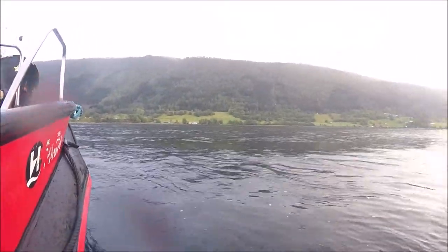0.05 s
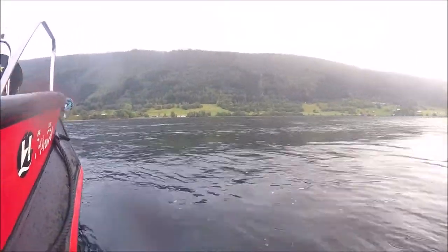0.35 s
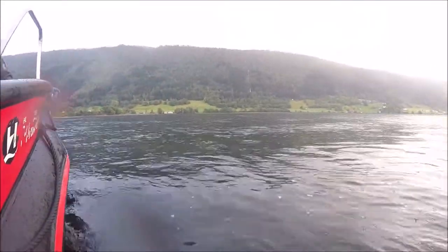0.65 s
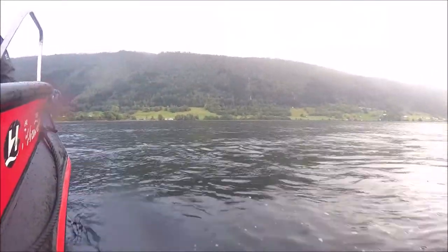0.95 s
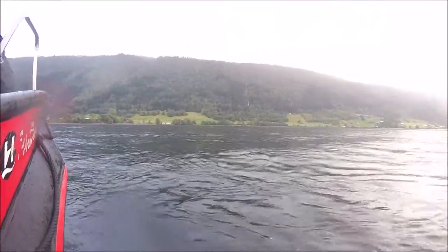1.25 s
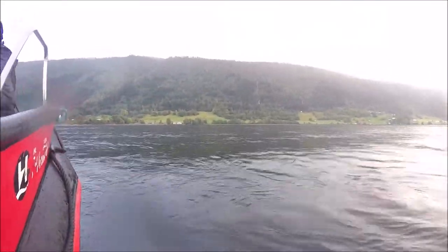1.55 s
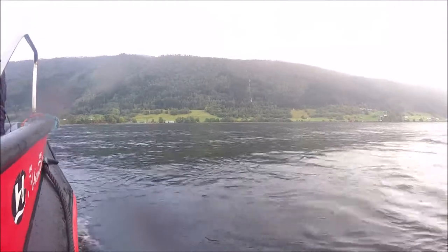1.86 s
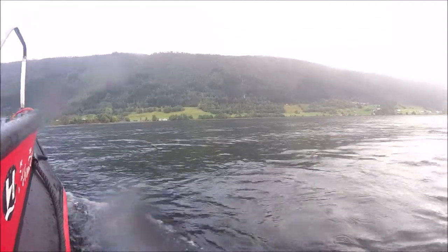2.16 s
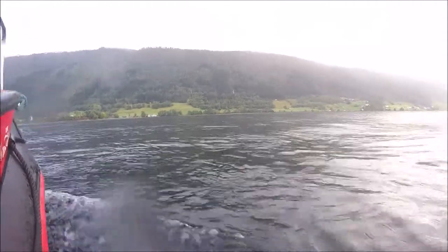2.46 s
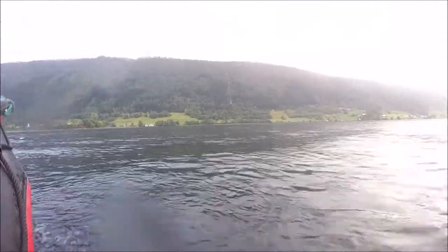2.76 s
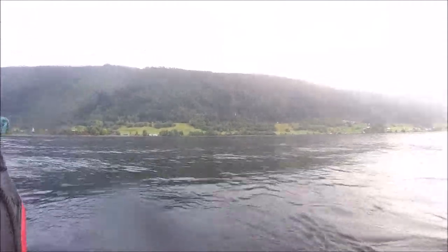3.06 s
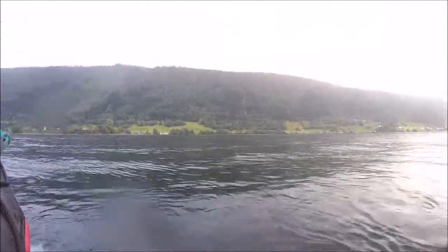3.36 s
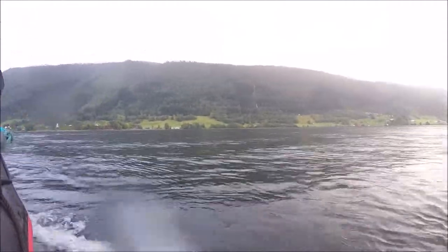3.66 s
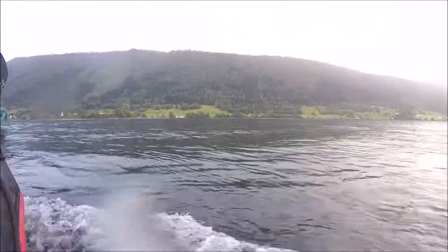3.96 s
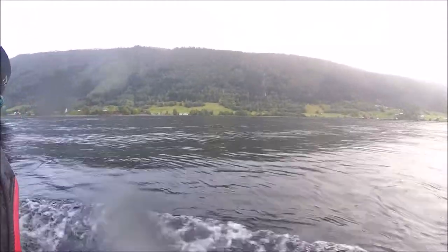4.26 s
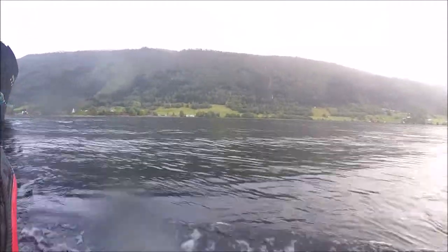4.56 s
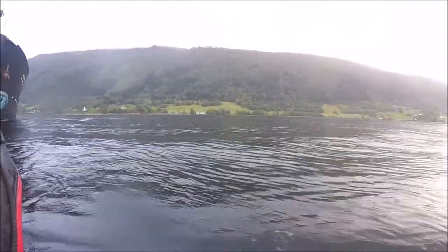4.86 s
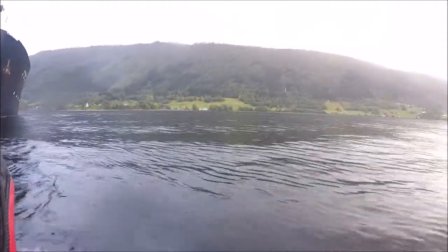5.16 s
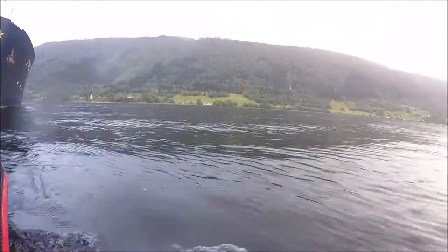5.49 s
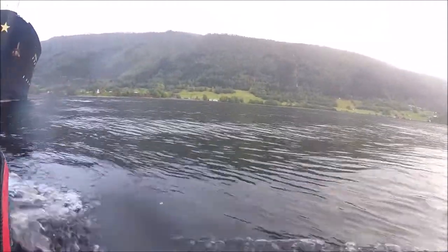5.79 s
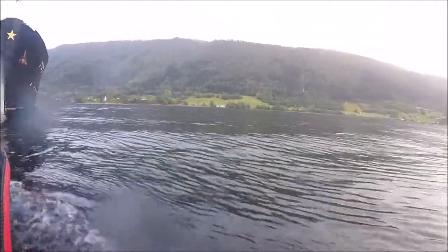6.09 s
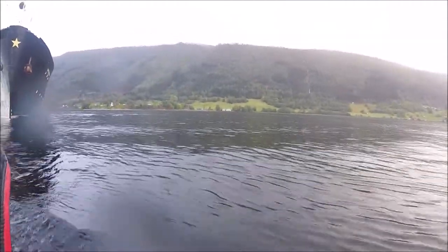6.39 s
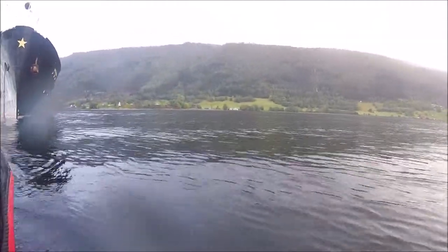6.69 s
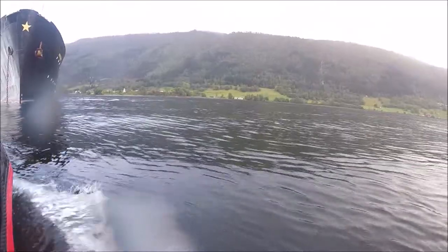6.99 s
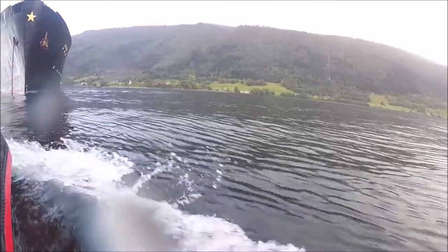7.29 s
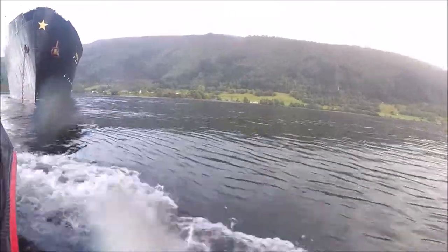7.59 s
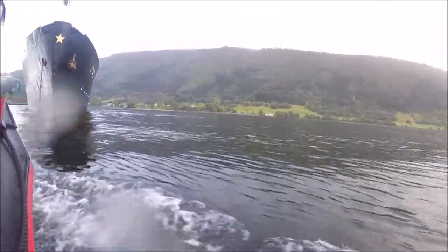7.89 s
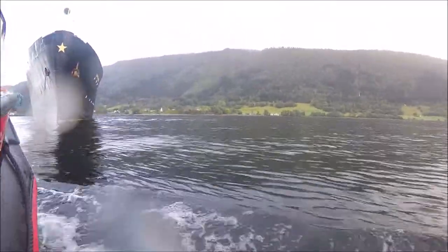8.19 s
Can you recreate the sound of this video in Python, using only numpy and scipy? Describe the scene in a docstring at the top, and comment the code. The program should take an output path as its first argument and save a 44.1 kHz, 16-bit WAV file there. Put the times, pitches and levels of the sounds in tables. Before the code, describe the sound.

Water surges and splashes along a small boat's hull over a faint engine hum and wind rumble, with sharp drop ticks on the microphone.

```python
"""Drops tick sharply on a waterproof case over a rumble of wind; then a bow wave starts to surge.
An inflatable boat is running over calm water, heard from inside the case, low beside the hull.
Each wave breaks in ringing bubbles, spray and foam, with wavelets slapping and air pockets gulping.
The case's narrow resonances colour the waves and slaps; an engine hums behind the wash of the wake."""
import sys
import numpy as np
from scipy import signal
from scipy.fft import rfft, irfft
from scipy.io import wavfile
from scipy.ndimage import uniform_filter1d

SR = 44100
rng = np.random.default_rng(int(sys.argv[2]) if len(sys.argv) > 2 else 0)


def output_pcm(signal):
    """Save a mono or channel-first signal as 16-bit PCM at the path in sys.argv[1].

    Samples are clipped to [-1, 1] before scaling.
    """
    pcm = np.clip(np.atleast_2d(signal).T, -1, 1) * 32767
    wavfile.write(sys.argv[1], SR, np.round(pcm).astype(np.int16))


N = 363384
TIME = np.arange(N) / SR

# Waves breaking from the bow. Each row: crest, rise and hold in seconds, fade in dB per second,
# then rush level, tilt toward small bubbles, extra spray and extra deep churn, all in dB.
BOW_WAVES = [(1.068, 0.12, .04, 34.5, -59, -3, -18, 1), (1.45, 0.29, .15, 40, -59.5, -3.5, -17, 1),
             (1.68, .09, .1, 70, -50.5, -0.5, -4, 5.5), (1.85, .08, .05, 50, -46, -8.5, 2.5, 0.5),
             (2.33, .28, 0.22, 105.5, -55.5, -14, -4, 3.5), (3.091, .2, .12, 60, -53.5, -1, -3, 1.5),
             (3.29, .11, .08, 70, -48, 5, 7, 5), (3.47, .17, .54, 47, -41.5, -3, 2.5, -2.3),
             (4.36, .08, .03, 60, -53, 3, -2, -3), (4.53, .12, .19, 70, -48, 11, 4, -6),
             (4.81, .1, .04, 230, -44, -16, 0.5, -1), (5, .07, .03, 80, -52.5, -11, 4.5, -2),
             (5.16, .12, .15, 30, -50, 2.5, 1, -3), (5.51, .08, .05, 45, -51, 3, 2, -6),
             (5.8, .1, .18, 110, -45.5, 3.5, -0.7, -20), (6.72, .08, .04, 80, -47.5, 8, -3.5, -16),
             (6.93, .14, .06, 60, -47, 11, 5.5, 0), (7.07, .16, .49, 45, -39, -4.5, .2, -4.5),
             (7.44, .09, .04, 80.5, -48, 5, -11, 11), (8.08, .09, .06, 70, -48.5, 3, -3, 6.5),
             (8.22, .16, .1, 60, -45.5, 7, 5, -8.5)]
# Ripples between waves: opening rush level, small-bubble tilt, extra spray, extra churn, all in dB.
HULL_RIPPLES = (-67, -4.5, 2, 11)
# The tone of breaking water. Each row: frequency in Hz, relative level in dB.
WATER_EQ = [(60, -11), (130, 1.5), (250, -8.5), (500, -11.5), (800, -12), (1600, -2), (3000, 1),
            (5000, -10), (8000, -22.5), (11000, -31), (15000, -32.5)]
# The case's peaks and notches. Each row: centre in Hz, half width in Hz, gain in dB.
CASE_EQ = [(1727, 240, 5), (2275, 171, -8.5), (2910, 240, 2), (3280, 170, 3.5), (3610, 193, -5),
           (4093, 163, 4.5), (5340, 370, 1.5), (6020, 240, -8.5), (6653, 370, 4), (7200, 190, -2.5),
           (7830, 330, 2.5), (9100, 560, 0), (10710, 870, 6.5), (12300, 460, 1)]
# The loudest hull slaps. Each row: start in seconds, peak in dB, bubble pitch in Hz, decay in seconds.
HULL_SLAPS = [(.294, -47.5, 3010, .007), (.573, -48, 2930, 0.0047), (1.476, -43, 3200, .004),
              (1.612, -41, 3370, 0.0054), (1.676, -30, 1320, .0045), (1.723, -39, 3130, 0.007),
              (1.756, -38.5, 1850, 0.0063), (1.873, -34.5, 3950, .008), (1.888, -33, 1970, .005),
              (2.299, -48, 1820, .006), (2.409, -35, 1807, 0.0045), (2.96, -44, 1950, 0.0067),
              (3.033, -48, 1700, .005), (3.158, -45.5, 1670, .004), (3.223, -37.5, 3270, 0.0074),
              (3.293, -41, 600, .0054), (3.952, -31, 3000, .005), (4.252, -45.5, 215, .006),
              (4.305, -35.5, 2920, .006), (4.348, -36, 2960, 0.01), (4.458, -37.5, 2920, .0045),
              (4.754, -29, 2790, .006), (4.856, -33.5, 3130, .004), (5.131, -37.5, 3100, .007),
              (5.861, -32.5, 1980, 0.006), (5.967, -37.5, 1950, .006), (6.516, -47, 3000, .005),
              (6.664, -45.5, 205, .0055), (6.682, -32.5, 2870, 0.0054), (6.825, -34.5, 3660, .007),
              (7.158, -27, 1920, 0.0053), (8.049, -36.5, 2830, 0.0079)]
# Deep slaps splash wider than bright ones. Each row: bubble pitch in Hz, splash level in dB.
SPLASH_BY_PITCH = [(600, 5), (1300, -3), (1800, -17), (3500, -14.5)]
# The biggest bubbles beside the hull. Each row: start in seconds, relative level in dB, pitch in Hz.
AIR_POCKETS = [(1.728, -49, 877), (1.902, -49, 940), (2.239, -52, 1028), (3.257, -48.5, 806),
               (4.772, -49, 462), (4.861, -43, 900), (5.211, -51, 715), (5.292, -47, 1120),
               (5.504, -50, 966), (6.099, -51, 1080), (6.859, -45, 1267), (7.436, -45.5, 552),
               (8.068, -40, 1150)]
# Drops hitting the case. Each row: start in seconds, peak in dB, tilt in dB per octave, ring factor.
DROP_HITS = [(0.0332, -39.5, 8, 1.44), (0.058, -21.5, 6.5, 0.28), (0.0915, -10, -2.5, 0.79),
             (1.666, -31, 1.5, 1.42), (3.3974, -6.5, 0, 1.25), (5.762, -27.5, 0, 1.1), (5.99, -34, -1, 1.3)]
# The struck case wall. Each row: frequency in Hz, relative level in dB, base 60 dB decay in seconds.
WALL_MODES = [(1170, -20.5, 0.0062), (2343, -2, 0.0096), (2880, -1, 0.0044), (3860, -8, 0.0046),
              (5270, -18.5, 0.0057), (7530, -18.5, 0.0043), (9800, -24, 0.0047), (12000, -28.5, 0.0021)]
# The tone of wind on the case. Each row: frequency in Hz, relative level in dB.
WIND_EQ = [(1, -50), (6, -11), (12, 1), (25, 1.5), (38, -8), (55, -7), (75, -9.5), (100, -20.5), (135, -31),
           (200, -40), (400, -45), (1500, -108)]
# Gusts. Each row: crest, rise and hold in seconds, fade in dB per second, relative level in dB.
WIND_GUSTS = [(.06, 0.11, 0.24, 9, -39), (1.1, 0.56, 0.57, 20, -38), (4.42, .08, 0.53, 70, -41.5),
              (5.42, 0.1, .1, 48, -39), (6.5, 0.13, 0.9, 13, -47.5)]
# Single buffets of air. Each row: centre in seconds, peak in dB, frequency in Hz.
WIND_BUFFETS = [(.354, -37, 58.6), (.795, -25, 28.2), (1.07, -36.5, 31.8), (1.226, -30.5, 41),
                (1.618, -26.5, 21.3), (1.705, -29, 41.3), (4.431, -27.5, 31.5), (4.574, -35, 43.4),
                (4.755, -30.5, 27.6), (6.689, -34.5, 49.5)]
# The engine's run. Each row: time in seconds, firing rate in Hz, base level in dB.
ENGINE_RUN = [(0, 53.6, -68), (.65, 53.3, -61.5), (1.25, 53.4, -66.5), (1.8, 54.3, -66.5),
              (2.3, 54.2, -63.5), (2.7, 53.8, -61.5), (3.1, 53.5, -72), (5, 53.4, -66), (6.4, 53.3, -76.5),
              (8.24, 53.5, -69)]
# The hum's harmonics. Each row: multiple of the firing rate, offset from the base level in dB.
HUM_HARMONICS = [(1, 13.5), (2, -0.5), (3, -4), (4, -14.5), (5, -29), (6, -27), (7, -24), (9, -21)]
# The tone of the wake. Each row: frequency in Hz, relative level in dB.
WAKE_EQ = [(30, -4), (120, 1), (200, -5.5), (300, -9), (500, -11.5), (1000, -14.5), (2300, -13.5),
           (4000, -20), (8000, -24), (15000, -28)]
# Where small bubbles, spray and churn sit. Each row: frequency in Hz, share of that boost applied.
SMALL_BAND = [(800, -0.0044), (1400, -0.27), (2050, -0.18), (2600, 0.3), (4200, 0.33), (5500, -0.007),
              (9000, 0.13), (14000, 0.2)]
SPRAY_BAND = [(4200, 0.058), (5600, 0.85)]
CHURN_BAND = [(750, 1.0), (1350, 0.071)]


def bow_wave(level_db=-0.5, foam_db=-3, spatter_db=-10, flutter_db=0.6, cloud_db=1.37):
    """Bubbles, spray and hissing foam swell together, their mix shifting as each wave breaks."""
    rush_db = np.interp(TIME, TIME[::64], surge(TIME[::64])[0])
    water = bubbles(rush_db) + amp(spatter_db) * spatter() + amp(foam_db) * rng.standard_normal(N)
    water = resonate(unit(water), lambda hz: spectrum(WATER_EQ, hz) + case_db(hz))
    hz, t, bands = signal.stft(water, SR, nperseg=512, noverlap=384)
    _, small_db, spray_db, churn_db = surge(t)
    spray_db += 2.5 * np.interp(t, TIME, wander(41))  # the high hiss flickers quickly at random
    small_db += 1.5 * np.interp(t, TIME, wander(9.2))  # the bubble size sways
    moving_eq_db = (np.outer(spectrum(SMALL_BAND, hz), small_db)
                    + np.outer(spectrum(SPRAY_BAND, hz), spray_db)
                    + np.outer(spectrum(CHURN_BAND, hz), churn_db))
    # clouds of like-sized bubbles come and go
    clouds = uniform_filter1d(rng.standard_normal(bands.shape), size=7, axis=0)
    clouds = unit(uniform_filter1d(clouds, size=12, axis=1))
    bands = bands * amp(moving_eq_db + cloud_db * clouds)
    water = signal.istft(bands, SR, nperseg=512, noverlap=384)[1][:N]
    return water * amp(level_db + rush_db + flutter_db * wander(21.3))


def surge(t, ripple_growth_db_per_s=0.82):
    """Ripples and waves add in power, each with its own mix: rush, small bubbles, spray, churn in dB."""
    ripples = amp(HULL_RIPPLES[0] + ripple_growth_db_per_s * t)
    waves = [amp(wave[4]) * swell(t, *wave[:4]) for wave in BOW_WAVES]
    power = np.array([ripples] + waves) ** 2
    mixes = amp([HULL_RIPPLES[1:]] + [wave[5:] for wave in BOW_WAVES]) ** 2
    total = power.sum(axis=0)
    return 10 * np.log10([total, *(mixes.T @ power / total)])


def bubbles(rush_db, base_per_s=4400, size_db=3.5, clump_db=2.0, pitches=44):
    """Bubbles of many sizes ring; a stronger surge makes so many that they melt into a rush."""
    crowd = amp(np.maximum(rush_db + 52, -3))
    births = np.cumsum(base_per_s / pitches * crowd * amp(clump_db * wander(35))) / SR
    out = np.zeros(N)
    for hz in np.geomspace(280, 14500, pitches):
        # small bubbles are more numerous and ring for more cycles
        count = int(births[-1] * (hz / 2000) ** 0.45)
        ping = bubble_ping(hz, cycles=9 * (hz / 2000) ** 0.24, glide=0.032)
        when, luck = rng.random((count, 2)).T
        onsets = np.searchsorted(births, when * births[-1])
        sizes = amp(size_db * np.minimum(-np.log(1 - luck), 4)) / np.sqrt(crowd[onsets])
        triggers = np.bincount(onsets, sizes, N)
        out += np.sqrt(hz) * unit(signal.oaconvolve(triggers, ping)[:N])
    return unit(out)


def bubble_ping(hz, cycles, glide):
    """One bubble: a quick attack, a short ring and a pitch that slides up."""
    turns = np.arange(int(4 * cycles * SR / hz)) * hz / SR
    envelope = np.exp(-2 * turns / cycles) * (1 - np.exp(-3 * turns))
    return envelope * np.sin(2 * np.pi * turns * (1 + glide * turns / cycles))


def spatter(per_s=1500, size_db=3.5):
    """Fine spray falls back as tiny ticks."""
    sizes = amp(size_db * np.minimum(rng.exponential(1, N), 4))
    return unit((rng.random(N) < per_s / SR) * sizes * rng.choice([-1, 1], N))


def slaps(attack_s=0.00075, stray_decay_s=0.0042, width_octaves=0.24, dull_hz=5500):
    """Each wavelet on the hull traps a burst of bubbles around one pitch, over a wider splash."""
    out, t = np.zeros(N), np.arange(SR // 10) / SR
    wavelets = strays(count=36, over_db=6, spread_db=8, follow=0.75, low_hz=1520, high_hz=3500)
    flecks = strays(count=20, over_db=1, spread_db=4, follow=0.83, low_hz=6000, high_hz=8400)
    stray_slaps = [(*row, stray_decay_s) for row in wavelets + flecks]
    for start, peak_db, pitch_hz, decay_s in HULL_SLAPS + stray_slaps:
        def colour_db(hz):
            """Bubble peak and splash skirt, dulled and heard through the case."""
            octaves = np.log2((hz + 1) / pitch_hz)
            skirt = amp(spectrum(SPLASH_BY_PITCH, pitch_hz)) / (1 + octaves ** 2)
            high_cut_db = 10 * np.log10(1 + (hz / dull_hz) ** 4)
            return 20 * np.log10(bell(octaves, 0, width_octaves) + skirt) + case_db(hz) - high_cut_db
        envelope = (1 - np.exp(-t / attack_s)) * np.exp(-t / decay_s)
        burst = resonate(rng.standard_normal(len(t)) * envelope, colour_db)
        add(out, start, amp(peak_db) * burst / abs(burst).max())
    return out


def gulps(level_db=3.0):
    """Large pockets of air close and ring one at a time."""
    out = np.zeros(N)
    stray_gulps = strays(count=16, over_db=-5, spread_db=9, follow=0.45, low_hz=522, high_hz=1290)
    for start, db, hz in AIR_POCKETS + stray_gulps:
        add(out, start, amp(db + level_db) * bubble_ping(hz, cycles=11, glide=0.036))
    return out


def strays(count, over_db, spread_db, follow, low_hz, high_hz):
    """Scattered hits that ride the rush. Each row: start in seconds, level in dB, pitch in Hz."""
    when, size, pitch = rng.random((count, 3)).T
    starts = (np.arange(count) + when) / count * N / SR
    rush_db = surge(starts)[0]
    db = rush_db.mean() + follow * (rush_db - rush_db.mean()) + over_db + spread_db * (size - 0.5)
    return list(zip(starts, db, low_hz * (high_hz / low_hz) ** pitch))


def drops():
    """A drop on the case rings its wall for a few milliseconds: a hard, close tick."""
    out, t = np.zeros(N), np.arange(SR // 20) / SR
    for start, peak_db, tilt_db, ring_factor in DROP_HITS:
        tick = np.zeros(len(t))
        for k, (hz, db, t60) in enumerate(WALL_MODES):
            gain = (-1) ** k * amp(db + tilt_db * np.log2(hz / 2400))
            decay = amp(-60 * t / (t60 * ring_factor))
            tick += gain * decay * np.sin(2 * np.pi * hz * t)
        add(out, start, amp(peak_db) * tick / abs(tick).max())
    return out


def wind(level_db=-2.0, lumps_db=1.5, breeze_db=-41, ease_db_per_s=0.43):
    """Lumpy turbulence rumbles on the case, swelling in gusts over a slowly easing breeze."""
    breeze_power = amp(breeze_db - ease_db_per_s * TIME) ** 2
    gust_power = sum((amp(db) * swell(TIME, *shape)) ** 2 for *shape, db in WIND_GUSTS)
    out = noise(WIND_EQ) * np.sqrt(breeze_power + gust_power) * amp(level_db + lumps_db * wander(8.5))
    for centre, peak_db, hz in WIND_BUFFETS:
        phase = 2 * np.pi * hz * (TIME - centre)
        out += amp(peak_db) * phase * np.exp((1 - phase ** 2) / 2)  # an eddy pushes and pulls once
    return out


def engine(drift=0.0043, throb_db=3, whine_hz=8520, whine_db=-85.5, whine_jitter=0.0069):
    """Low harmonics of the firing rate throb through the hull, under a faint, thin whine."""
    firing_hz, base_db = curves(ENGINE_RUN, TIME)
    firings = np.cumsum(firing_hz * (1 + drift * wander(5.6))) / SR
    hum = np.zeros(N)
    for multiple, db in HUM_HARMONICS:
        gain = amp(base_db + db + throb_db * wander(11.4))
        hum += gain * np.sin(2 * np.pi * (multiple * firings + rng.random()))
    whine_turns = np.cumsum(whine_hz * (1 + whine_jitter * wander(60))) / SR
    return np.sqrt(2) * (hum + amp(whine_db) * np.sin(2 * np.pi * whine_turns))


def wake(level_db=-63):
    """The wake lays a soft, even wash under everything."""
    return amp(level_db) * noise(WAKE_EQ)


def case_db(hz):
    """The colour that the case gives to sound passing through it."""
    return sum(db * bell(hz, centre, width) for centre, width, db in CASE_EQ)


def resonate(x, colour_db, size=2048):
    """Minimum-phase EQ from a curve of dB against Hz; white noise keeps its power."""
    log_gain = np.log(amp(colour_db(abs(np.fft.fftfreq(size, 1 / SR)))))
    taps = np.fft.ifft(np.exp(np.conj(signal.hilbert(log_gain)))).real
    return signal.oaconvolve(x, taps / np.linalg.norm(taps))[:len(x)]


def swell(t, crest, rise, hold, fade_db_per_s):
    """The envelope of a wave or gust: it builds to its crest, holds, then drains away."""
    build = np.sin(np.pi / 2 * np.clip(1 + (t - crest) / rise, 0, 1)) ** 2
    return build * amp(-fade_db_per_s * np.maximum(t - crest - hold, 0))


def noise(eq):
    """Noise of rms 1, shaped by an EQ table."""
    gain = amp(spectrum(eq, np.fft.rfftfreq(N, 1 / SR)))
    return unit(irfft(rfft(rng.standard_normal(N)) * gain, N))


def wander(rate_hz, size=4096):
    """Smooth random modulation of rms 1, moving at up to about rate_hz."""
    t = np.linspace(0, N / SR, size)
    low_pass = bell(np.fft.rfftfreq(size, t[1]), 0, rate_hz)
    return np.interp(TIME, t, unit(irfft(rfft(rng.standard_normal(size)) * low_pass)))


def curves(rows, t):
    """A table's columns as automation curves at the times t."""
    times, *columns = np.transpose(rows)
    return [np.interp(t, times, column) for column in columns]


def spectrum(points, hz):
    """Reads a curve on a log-frequency axis."""
    point_hz, values = np.transpose(points)
    return np.interp(np.log(hz + 1), np.log(point_hz + 1), values)


def bell(x, centre, width):
    """A smooth bump of height 1."""
    return np.exp(-((x - centre) / width) ** 2)


def amp(db):
    """Decibels to gain."""
    return 10 ** (np.asarray(db) / 20)


def unit(x):
    """Scales to rms 1."""
    return x / np.sqrt(np.mean(x ** 2) + 1e-20)


def add(mix, start_s, sound):
    """Lays a sound into the mix at its cue."""
    part = mix[max(round(start_s * SR), 0):][:len(sound)]
    part += sound[:len(part)]


def scene():
    """Water, engine and wind in one mono mix."""
    return (bow_wave() + slaps() + gulps() + drops() + engine() + wind() + wake())[None]


def record(dry):
    """A steep high cut takes the very top off the mix."""
    high_cut = signal.firwin(511, cutoff=15450, window=("kaiser", 9), fs=SR)
    return signal.oaconvolve(dry, high_cut[None], "same")


dry = scene()
out = record(dry)
output_pcm(out)
```